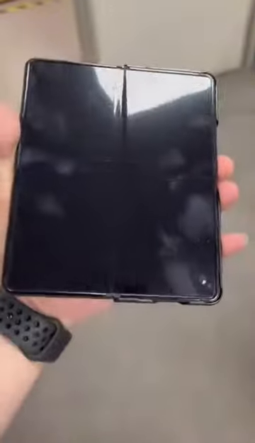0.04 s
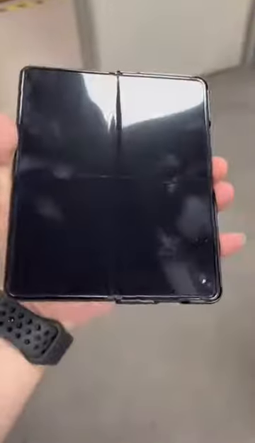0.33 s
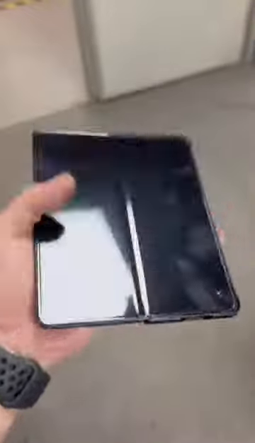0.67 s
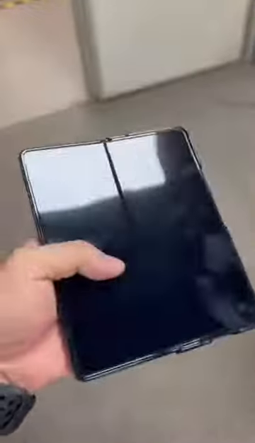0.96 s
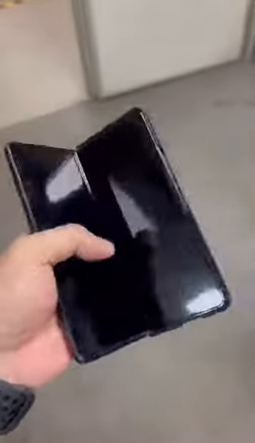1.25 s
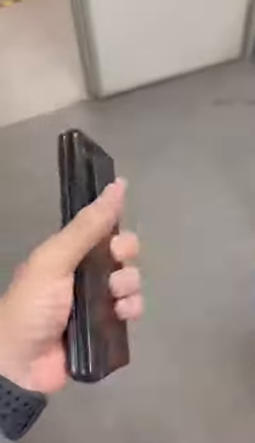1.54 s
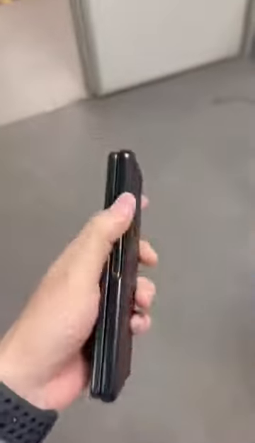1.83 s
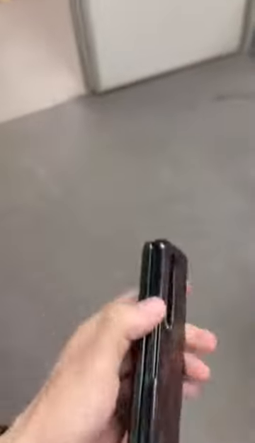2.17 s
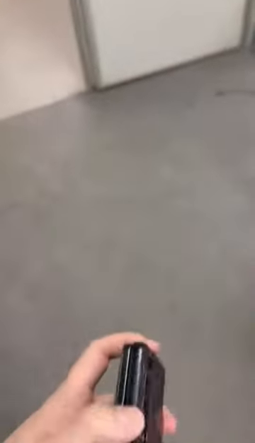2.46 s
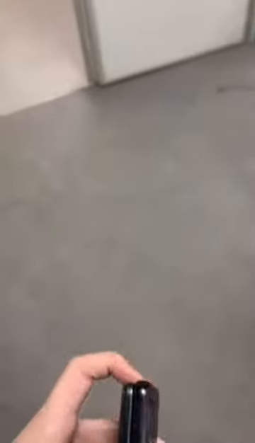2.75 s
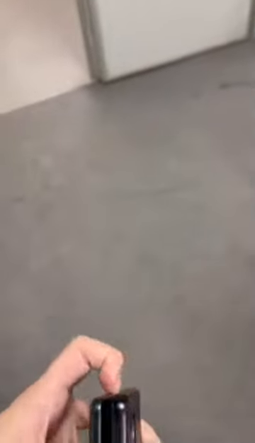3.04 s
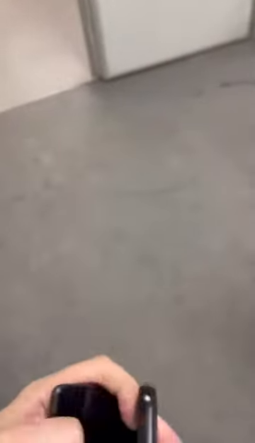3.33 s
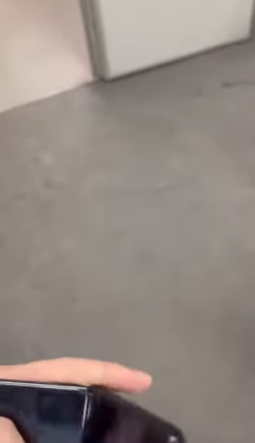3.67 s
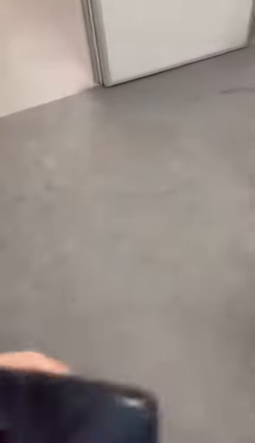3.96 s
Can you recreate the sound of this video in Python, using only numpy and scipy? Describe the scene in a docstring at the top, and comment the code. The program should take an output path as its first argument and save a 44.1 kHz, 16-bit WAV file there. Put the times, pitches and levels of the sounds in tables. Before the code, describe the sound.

A folding phone claps shut, then creaks in the hand and clicks open again.

```python
"""A folding phone claps shut in one hand, close to the microphone, and a bare room answers.
The hinge whispers, then magnets pull the halves together: a short knock of the body, a gritty crack
of the edges and a faint ring of the frame. Fingers creak on the case, pry it open again and the hinge
clicks flat. Under it all are a low ventilation hum and the rumble and rub of handling."""
import sys
import numpy as np
from scipy import signal
from scipy.fft import rfft, irfft
from scipy.io import wavfile

SR = 44100
rng = np.random.default_rng(int(sys.argv[2]) if len(sys.argv) > 2 else 0)


def store_pcm(level_fs):
    """Save levels as 16-bit WAV."""
    pcm = np.round(np.clip(level_fs, -1, 1) * 32767).astype(np.int16)
    wavfile.write(sys.argv[1], SR, np.atleast_2d(pcm).T)


N = 176400
SHORT, LONG = 2 ** 13, 2 ** 15  # samples: bursts and filters, ringing tails

# Tone of hard contacts, both hinge clicks and the closing crack. Each row: frequency in Hz, gain in dB.
CLICK_EQ = [(150, -15), (500, 4.5), (900, 5), (1700, 3.5), (2800, -3), (4600, -6), (7500, -17),
            (11000, -14.5), (15000, -21)]


def undb(db):
    """Decibels to gain."""
    return 10 ** (np.asarray(db) / 20)


def unit(x):
    """Scale to rms 1."""
    return x / np.sqrt(np.mean(x ** 2))


def times(size=N):
    """Time of every sample in seconds."""
    return np.arange(size) / SR


def fader(rows):
    """Gain that follows (seconds, dB) points."""
    return undb(np.interp(times(), *np.array(rows).T))


def on_log(rows, hz):
    """Read (Hz, value) points on a log-frequency axis."""
    points_hz, values = np.array(rows).T
    return np.interp(np.log(np.maximum(hz, 1)), np.log(points_hz), values)


def equalise(x, rows, tilt_db=0):
    """Minimum-phase EQ through (Hz, dB) points, tilted by tilt_db per octave about 3 kHz."""
    hz = np.arange(SHORT + 1) * SR / (2 * SHORT)
    octaves = np.log2(np.maximum(hz, 300) / 3000)
    cepstrum = irfft(np.log(undb(on_log(rows, hz) + tilt_db * octaves)))
    cepstrum[1:SHORT] *= 2  # fold onto positive time, so nothing rings ahead of an attack
    cepstrum[SHORT + 1:] = 0
    impulse = irfft(np.exp(rfft(cepstrum)))[:SHORT]
    return signal.fftconvolve(x, impulse)[:len(x)]


def lowpass(x, hz):
    """Gentle treble roll-off."""
    return signal.sosfilt(signal.butter(2, min(hz, .45 * SR), fs=SR, output="sos"), x + 1e-18)


def place(x, start_s):
    """Lay a sound on the scene's timeline."""
    k = int(np.clip(start_s * SR, 0, N - 1))
    out = np.zeros(N)
    out[k:k + len(x)] = x[:N - k]
    return out


def ring(modes):
    """Decaying modes of alternating sign after one blow."""
    t = times(LONG)
    return sum((-1) ** k * undb(db) * np.sin(2 * np.pi * hz * t) * np.exp(-np.log(1000) * t / t60)
               for k, (hz, db, t60) in enumerate(modes))


def grains(size, spread_db=4):
    """Dense tiny contacts of uneven size."""
    return unit(rng.standard_normal(size) * undb(spread_db * rng.standard_normal(size)))


def burst(peak_s, db, rise_s, fall_s, ring_hz, ring_db, tilt_db, eq):
    """A cluster of tiny contacts swells and dies, ringing one resonance of the case."""
    lead_s = SHORT / SR / 2
    t = times(SHORT) - lead_s
    swell = np.exp(np.minimum(t / rise_s, -t / fall_s))
    whitened = irfft(np.exp(1j * np.angle(rfft(grains(SHORT) * swell))))
    crunch = whitened * swell ** .3  # taper the edges that whitening smears
    crunch = crunch / np.sqrt(np.sum(crunch ** 2))
    resonance = signal.lfilter(*signal.iirpeak(ring_hz, Q=7, fs=SR), crunch)
    voiced = equalise(crunch + undb(ring_db) * resonance, eq, tilt_db)
    return place(undb(db) * voiced, peak_s - lead_s)


def contacts(rows, eq, gain_db):
    """Bursts that face the microphone or are screened by the hand; returns direct sound and room send."""
    direct, send = 0, 0
    for *contact, direct_db in rows:
        hit = undb(gain_db) * burst(*contact, eq)
        direct = direct + undb(direct_db) * hit
        send = send + hit
    return direct, send


def ventilation(fan_hz=421, fan_width_hz=5.5):
    """Steady low air noise with one wavering fan tone, a narrow band of noise."""
    # Tone of the moving air. Each row: frequency in Hz, relative level in dB.
    air_eq = [(22, -21.5), (35, -21), (48, -5), (66, 3.5), (81, 9.5), (100, -5.5), (135, 0), (175, -1.5),
              (198, -4.5), (225, 1), (300, -11), (450, -10), (620, -19), (1000, -23), (2000, -31.5),
              (3000, -38), (4800, -40.5), (9000, -72), (15000, -58)]
    air = unit(equalise(rng.standard_normal(N), air_eq))
    noise = rfft(rng.standard_normal(N))
    hz = np.arange(len(noise)) * SR / N
    fan = unit(irfft(noise / (1 + ((hz - fan_hz) / fan_width_hz) ** 2), N))
    return undb(-37) * air + undb(-51.5) * fan


def room(send, predelay_s=.009, build_s=.001):
    """Diffuse echo of hard walls: a quickly building tail whose bass lingers longest."""
    # Decay of the room. Each row: frequency in Hz, T60 in seconds.
    decay = [(200, 3.95), (1000, 0.44), (4000, 0.44), (9000, 0.23), (15000, 0.55)]
    # Tone of the reverb return. Each row: frequency in Hz, gain in dB.
    return_eq = [(200, -8.5), (600, -9.5), (1100, -7), (2100, -2), (3200, -2.5), (4500, 0), (7500, -2.5),
                 (11000, -5.5), (15000, -31)]
    t = times(LONG)
    noise = rfft(rng.standard_normal(LONG))
    octave = np.log2(np.maximum(np.arange(len(noise)) * SR / LONG, 125) / 125)
    tail = 0
    for k in range(8):
        band = irfft(noise * np.maximum(1 - abs(octave - k), 0))
        t60 = on_log(decay, 125 * 2 ** k)
        tail = tail + band * np.exp(-np.log(1000) * t / t60)
    tail = tail * (1 - np.exp(-t / build_s))
    tail = equalise(tail / np.sqrt(np.sum(tail ** 2)), return_eq)
    return place(signal.fftconvolve(send, tail), predelay_s)


def handling(bump_rise_s=.0058):
    """Low rumble of moving hands and dull rubbing of the palm, with a few soft bumps."""
    # Fader moves of the rumble and the rub. Each row: time in seconds, level in dB.
    rumble_levels = [(0, -34.5), (.25, -40), (.65, -37.5), (.78, -37.5), (1, -36), (1.15, -37),
                     (1.9, -56.5), (2.2, -42), (2.45, -32.5), (2.85, -44.5), (3.3, -39.5), (3.62, -33),
                     (3.8, -47.5), (4, -60)]
    rub_levels = [(0, -69), (.3, -45.5), (.58, -49), (.76, -36.5), (.98, -43.5), (1.1, -54), (2, -47.5),
                  (2.35, -42), (2.55, -59), (2.85, -57), (3.2, -57), (3.36, -40), (3.62, -42), (3.8, -41),
                  (4, -68)]
    # Their tone. Each row: frequency in Hz, relative level in dB.
    rumble_eq = [(22, -16), (36, -8.5), (48, 3), (64, -11.5), (80, 9.5), (100, -13), (140, -7.5),
                 (280, -12), (500, -23.5), (1000, -32), (3000, -75)]
    rub_eq = [(60, -26), (125, 6.5), (280, 3.5), (450, -5.5), (700, -16.5), (2000, -50.5)]
    # The phone bumps in the palm. Each row: start in seconds, gain in dB.
    bumps = [(0.73, -20.5), (0.841, -20.5), (.93, -17), (1.001, -20), (2.259, -20.5), (2.472, -18),
             (3.443, -29.5), (3.604, -20), (3.744, -20)]
    # Low modes of one bump. Each row: frequency in Hz, relative level in dB, T60 in seconds.
    thud_modes = [(76, -4, 0.26), (136, -11.5, 0.1), (219.3, -19, 0.11), (328, -12.5, 0.091)]
    thud = ring(thud_modes) * (1 - np.exp(-times(LONG) / bump_rise_s))
    rumble = unit(equalise(rng.standard_normal(N), rumble_eq)) * fader(rumble_levels)
    rub = unit(equalise(rng.standard_normal(N), rub_eq)) * fader(rub_levels)
    return rumble + rub + sum(undb(db) * place(thud, start_s) for start_s, db in bumps)


def slide(jerk_db=2, jerk_hz=44.2, send_db=-5.5):
    """Fine, slightly jerky friction of the turning hinge and of skin on glass."""
    # Fader moves of the friction. Each row: time in seconds, level in dB.
    levels = [(0, -70), (.4, -62.5), (.7, -56), (.88, -62.5), (1.17, -51), (1.38, -60), (1.55, -49.5),
              (1.64, -52.5), (1.78, -65.5), (2.08, -67.5), (2.45, -56.5), (2.56, -65.5), (2.69, -55.5),
              (2.78, -66), (3.1, -62), (3.18, -57), (3.26, -65.5), (3.4, -60), (3.54, -120), (3.82, -50.5),
              (3.92, -64)]
    # Its whispery tone. Each row: frequency in Hz, relative level in dB.
    eq = [(400, -22), (1200, 8), (2500, 4.5), (4700, 2.5), (7000, -8), (10000, -4), (14000, -12.5)]
    jerk = undb(jerk_db * unit(lowpass(rng.standard_normal(N), jerk_hz)))
    friction = unit(equalise(grains(N), eq)) * fader(levels) * jerk
    return friction, undb(send_db) * friction


def grip_creaks():
    """Fingers creak and scuff on the case as the grip shifts."""
    # Each row is one creak: peak time in seconds, relative level in dB, rise and fall in seconds,
    # resonance in Hz, its gain in dB, tilt in dB per octave, direct-path gain in dB.
    creaks = [(1.707, -18.5, .0075, 0.013, 1180, 9, -7, -4),
              (2.141, -6.5, 0.01, 0.016, 1800, 5, -2.5, -1.5),
              (2.247, -3.5, 0.0081, 0.0039, 1690, 12.5, 3, -2.5),
              (2.257, -10, 0.0061, 0.0081, 4100, -17, 2.5, 6.5),
              (2.285, -17, 0.0051, 0.015, 1650, 6, -4, 0.5), (2.444, -21.5, 0.0041, .004, 3900, 10, -1, 2),
              (2.46, -10, 0.087, .025, 1620, 1, -5, -3.5),
              (2.525, -24, 0.0039, 0.0067, 1450, 10.5, -6.5, -2),
              (2.602, -24.5, 0.0042, .003, 3270, 13.5, 1, 3),
              (2.687, -26.5, 0.0082, 0.0061, 3300, -2, 5, 6),
              (2.878, -19, 0.013, 0.0063, 3800, -9, 2, -0.5),
              (2.994, -27.5, 0.0059, 0.0068, 3960, -11, 9.5, 1.5),
              (3.002, -16, 0.0013, .006, 1500, -7, -7.5, -1),
              (3.028, -15.5, .006, 0.035, 2000, -5, -8, -0.5), (3.175, -39, .02, .02, 8600, 2, 13.5, 1),
              (3.617, -11.5, 0.0042, 0.018, 1880, 1, 4, 4), (3.79, -21, 0.021, .035, 4400, 2, 10, -5),
              (3.968, -17, 0.0049, 0.0096, 3960, -10, 3, -3)]
    # Mid-heavy tone of a creak. Each row: frequency in Hz, gain in dB.
    eq = [(300, -6.5), (1100, -4), (1600, 0), (2300, -1.5), (3200, -3), (4400, -2.5), (7000, -16),
          (9800, -24.5), (14000, -30)]
    return contacts(creaks, eq, gain_db=3.5)


def hinge_clicks():
    """Hinge and case click as the phone is pried open and lands flat."""
    # Each row is one click: peak time in seconds, relative level in dB, rise and fall in seconds,
    # resonance in Hz, its gain in dB, tilt in dB per octave, direct-path gain in dB.
    clicks = [(3.0145, -21, 0.00072, .0022, 2280, 7, 5, 4), (3.4406, -9, 0.0028, 0.0041, 1160, -6, 1.4, 7),
              (3.6075, -4.5, 0.0017, 0.0051, 1470, -10.5, 2, -4.5),
              (3.7428, -0.5, 0.00021, 0.0022, 1510, -5, 1.5, 0.5),
              (3.7465, -5, 0.00026, 0.003, 1930, -3, 2, 1.5),
              (3.756, -15, 0.0026, 0.0023, 1680, -3, 0.5, 6.5)]
    return contacts(clicks, CLICK_EQ, gain_db=3)


def snap_shut(body_cut_hz=234):
    """One edge touches, then magnets clap the halves shut with a gritty crack; the floor echoes dully."""
    # The halves meet. Each row: start in seconds, gain in dB, treble cutoff in Hz.
    hits = [(1.4240, -19, 9000), (1.4326, -2, 15200)]
    # Modes of the hand-damped body and of the faint, long-ringing frame.
    # Each row: frequency in Hz, relative level in dB, T60 in seconds.
    body_modes = [(430, -29, 0.0041), (690, -23, 0.003), (1034, 3, 0.0075), (1680, 0, 0.0037),
                  (2800, -13, 0.0084), (3500, -14, 0.006), (4690, -4.5, 0.0028), (8050, -11, 0.0029),
                  (9900, -23, 0.006), (13600, -19, 0.004)]
    frame_modes = [(960, -41, 0.87), (1138, -31, 0.46), (1200, -39, 0.4), (1325, -38, .49),
                   (1470, -48, 0.43), (1604, -39, .45), (3490, -35, 0.28), (3720, -42, .2), (4300, -43, .4),
                   (4689, -42, 0.27), (5001, -39, 0.17)]
    body, frame = ring(body_modes), ring(frame_modes)
    clap = sum(undb(db) * place(lowpass(body, hz), start_s) for start_s, db, hz in hits)
    shimmer = sum(undb(db) * place(lowpass(frame, hz), start_s) for start_s, db, hz in hits)
    # The small body radiates little bass.
    clap = signal.sosfilt(signal.butter(4, body_cut_hz, "high", fs=SR, output="sos"), clap)
    # Grit crunches between the edges as they meet.
    shut_s = hits[-1][0]
    crack = burst(shut_s, db=5.5, rise_s=.0016, fall_s=.0019,
                  ring_hz=3750, ring_db=-9, tilt_db=1.5, eq=CLICK_EQ)
    floor_echo = undb(-26) * lowpass(place(clap + crack, start_s=.017), hz=2000)
    # The crack leaves the gap sideways, so the walls get more of it than of the body.
    send = undb(-1.5) * clap + undb(3.5) * crack
    return clap + crack + shimmer + floor_echo, send


def scene():
    """Mono mix: the phone, direct and through the room, over handling and ventilation."""
    clicks, creaks = hinge_clicks(), grip_creaks()
    direct, send = np.sum([snap_shut(), clicks, creaks, slide()], axis=0)
    return (direct + room(send) + handling() + ventilation())[None]


def record(dry):
    """The microphone has two dips in the treble; the top is cut at 15.5 kHz."""
    # Response of the microphone. Each row: frequency in Hz, gain in dB.
    mic_eq = [(20, 0.5), (5050, -2), (5650, -12.5), (6800, -2.5), (7500, 1), (10400, 0), (11600, -7.5),
              (12400, -28), (13300, -3), (14000, -5), (14800, -21)]
    top_cut = signal.ellip(8, .2, 70, 15500, fs=SR, output="sos")
    return signal.sosfilt(top_cut, equalise(dry[0], mic_eq))[None]


dry = scene()
out = record(dry)
store_pcm(out)
```